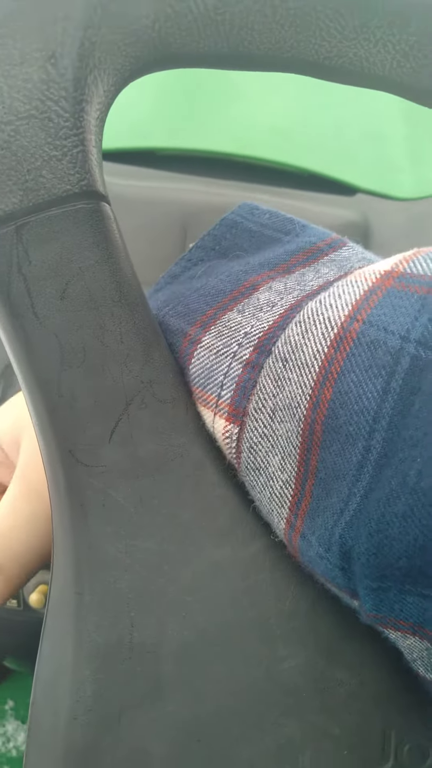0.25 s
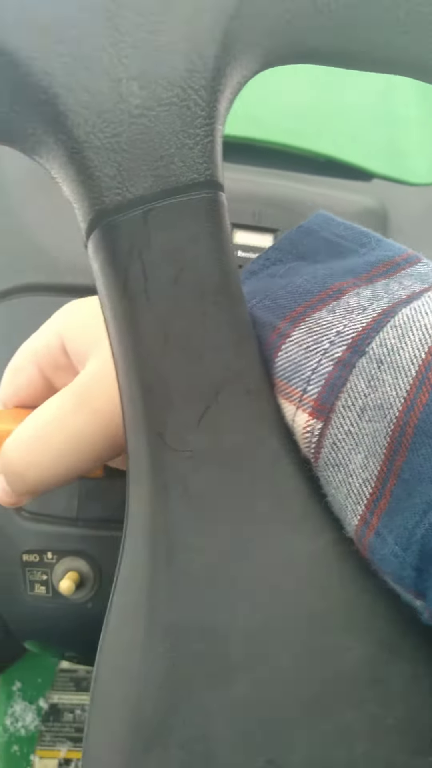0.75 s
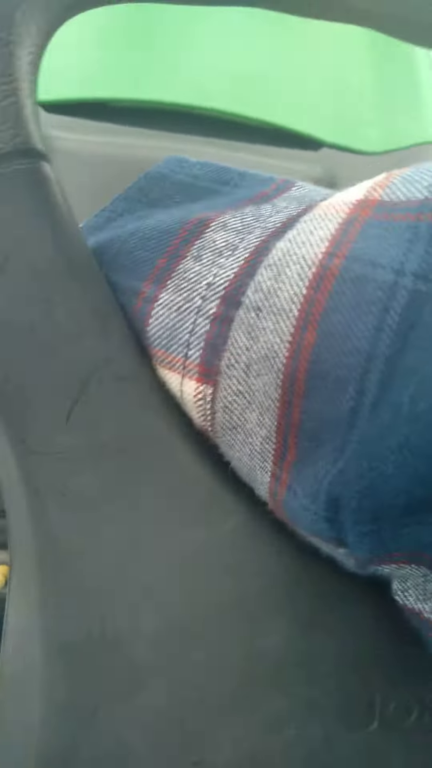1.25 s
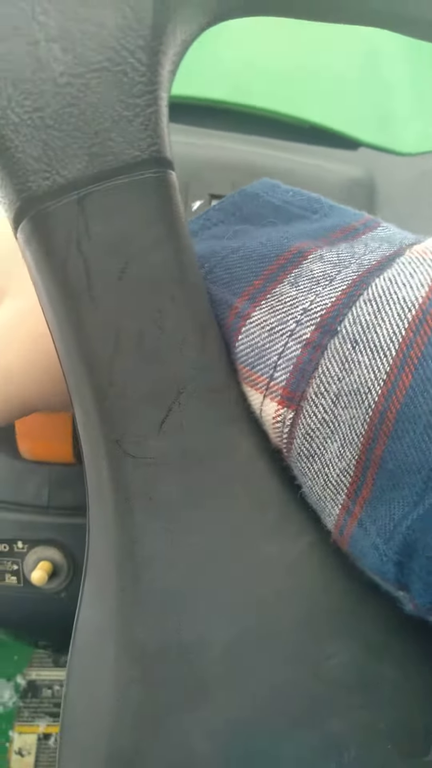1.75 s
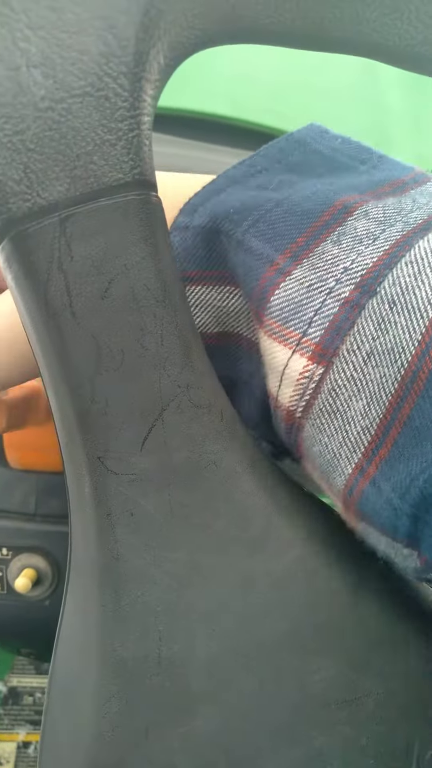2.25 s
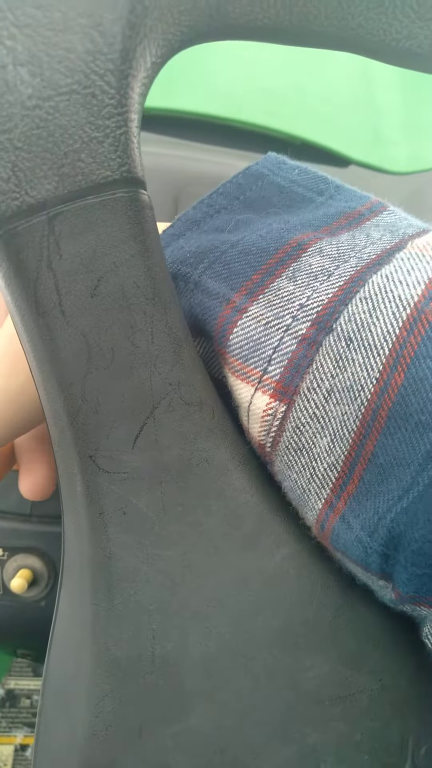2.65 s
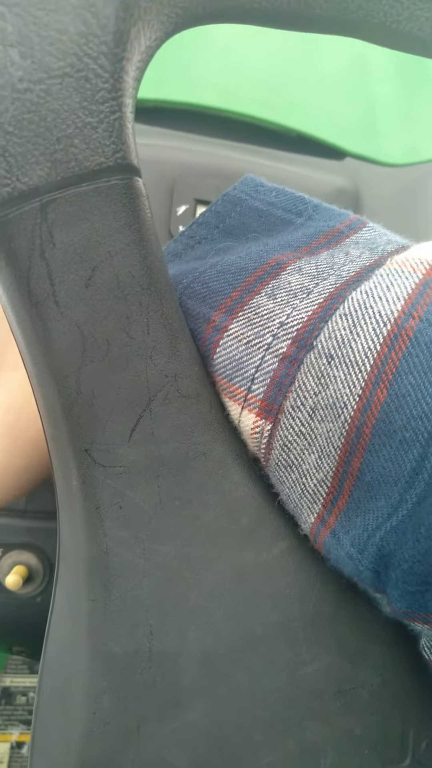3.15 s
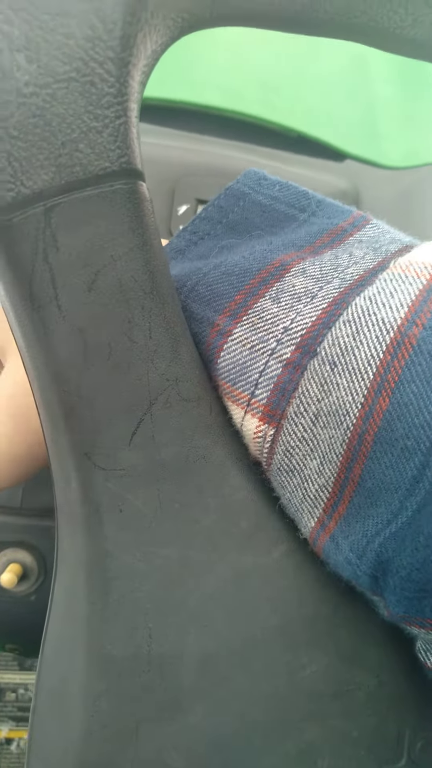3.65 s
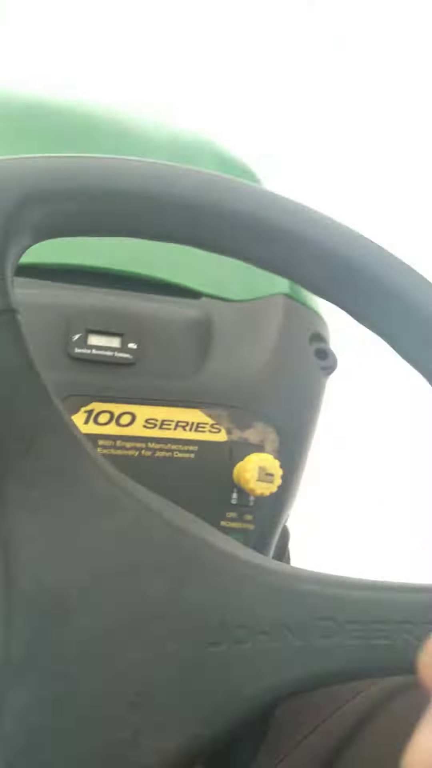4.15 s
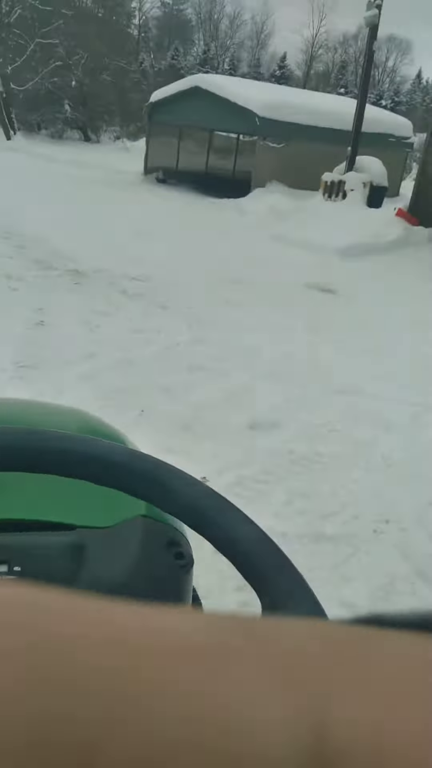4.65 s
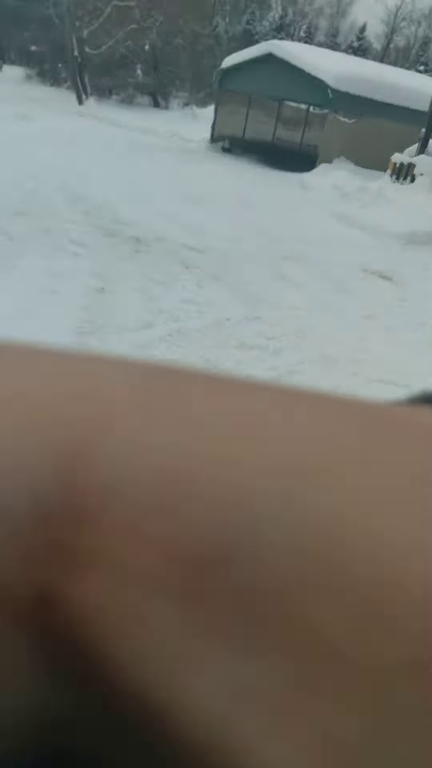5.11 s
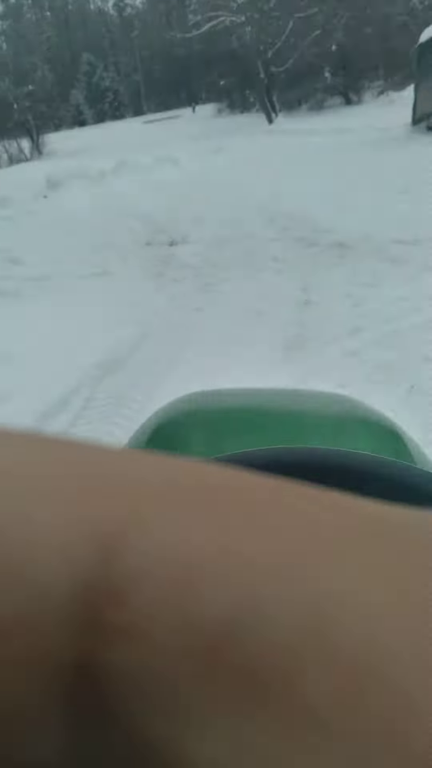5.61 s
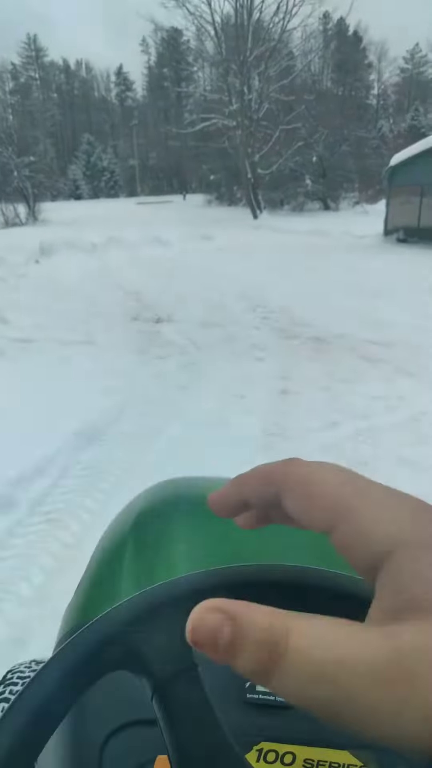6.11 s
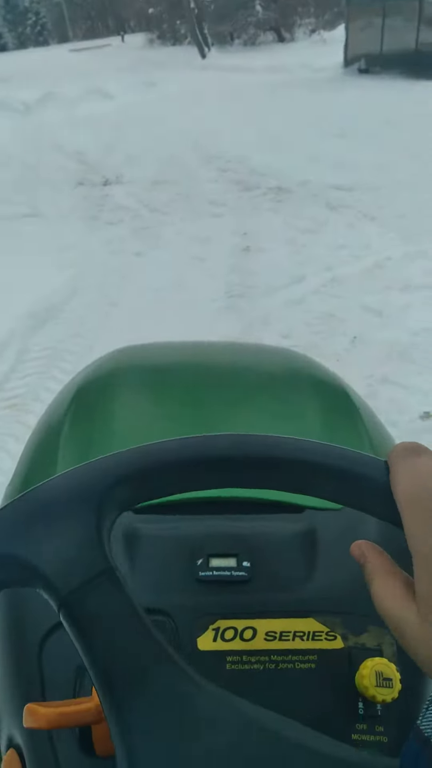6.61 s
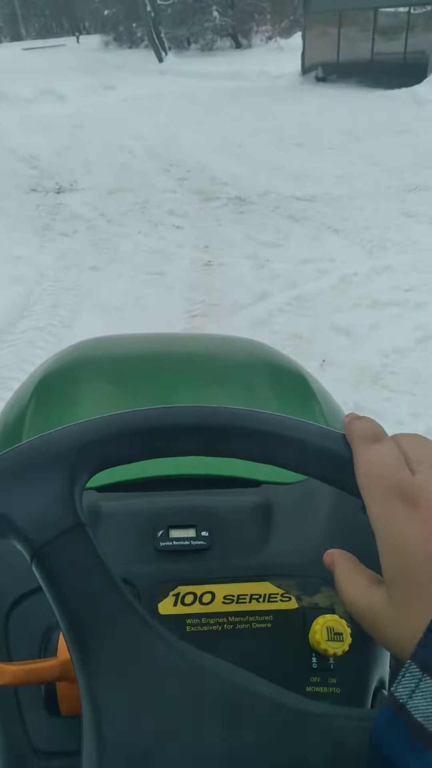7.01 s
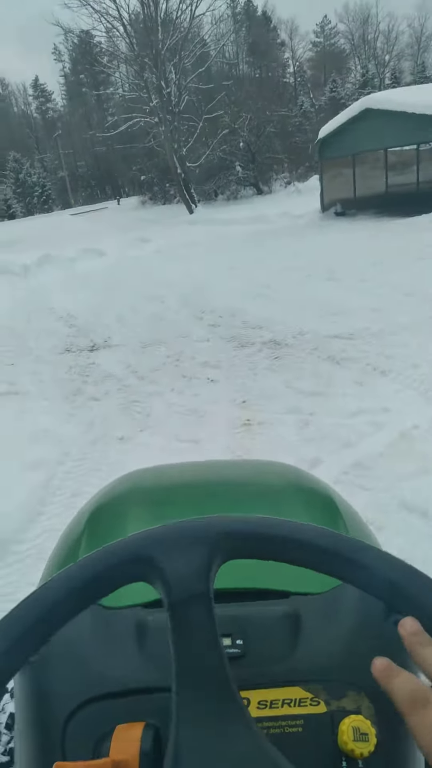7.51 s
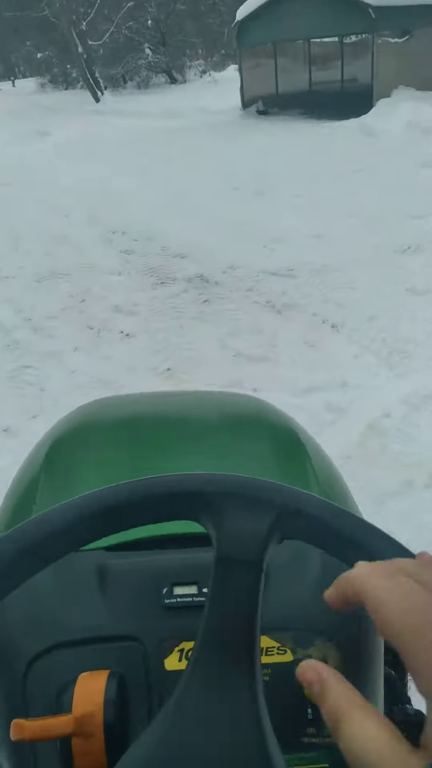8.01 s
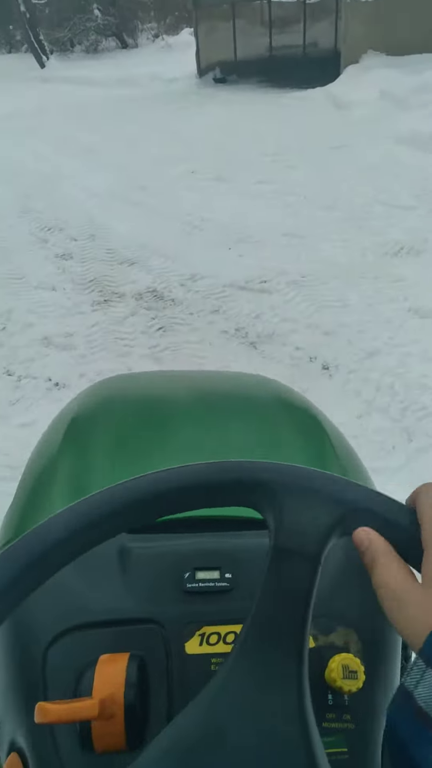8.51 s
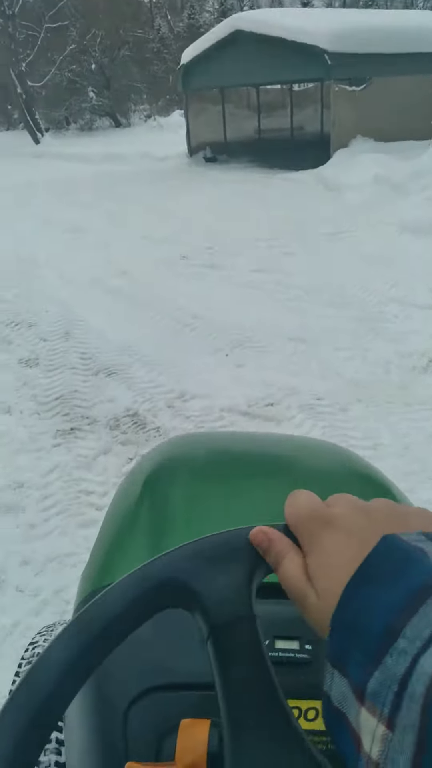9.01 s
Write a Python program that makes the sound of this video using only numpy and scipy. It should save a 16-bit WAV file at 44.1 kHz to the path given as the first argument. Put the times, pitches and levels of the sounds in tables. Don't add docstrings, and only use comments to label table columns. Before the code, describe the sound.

A small twin-cylinder tractor engine putters loudly up close, surging when throttled, with rattling tinwork, gassy hiss and missed beats.

```python
import sys
import numpy as np
from scipy import signal
from scipy.io import wavfile
from scipy.ndimage import map_coordinates

SR = 44100
rng = np.random.default_rng(int(sys.argv[2]) if len(sys.argv) > 2 else 0)


def volts(x):
    e = np.asarray(x, float) / 20
    return 10 ** e


def wrap_up_sound(samples):
    columns = np.atleast_2d(samples).T
    tamed = np.clip(columns, -1, 1)
    steps = np.round(tamed * 32767).astype(np.int16)
    wavfile.write(sys.argv[1], SR, steps)


N = 408366
TIME = np.arange(N) / SR
COARSE = np.arange(0, N + 4, 4) / SR
RAISED_AT_S, RAISING_S = 4.38, 0.31

# (time [s], rate [cycles/s])
ENGINE_SPEED = [(0.0, 17.404), (0.78, 15.74), (1.06, 20.055), (1.29, 21.767), (1.81, 18.586),
                (2.04, 21.885), (2.25, 23.206), (2.42, 23.402), (2.95, 21.588), (3.37, 20.593),
                (4.75, 19.778), (5.84, 19.381), (6.57, 20.135), (7.11, 16.981), (7.42, 19.086),
                (8.27, 20.804), (8.61, 21.249), (9.26, 20.562)]
# (valve closing [share of cycle], ring [dB], thump [dB], echo [dB], hiss [dB])
CYLINDER_PULSES = [
    (.915, 6, 16.5, -5.5, -7),
    (.29, 6, 15, 1, -4),
]
# (time [s], level [dB])
UPPER_TONE_PATH = [(0, -2), (.8, -11), (1.1, -1), (1.6, -4.5), (2.2, 1.5), (3.0, -0.5), (4.0, -2.5),
                   (4.7, -6.5), (6.3, -9.5), (6.8, -3), (7.6, -9.5), (8.2, -1.5), (9.26, -0.5)]


def rms_one(x):
    return x / np.sqrt(np.mean(x ** 2, axis=-1, keepdims=True) + 1e-20)


def in_time(rows):
    s, *columns = np.transpose(rows)
    return [np.interp(TIME, s, c) for c in columns]


def bump(u, at, width):
    return np.exp(-.5 * ((u - at) / width) ** 2)


def smooth_step(u, width):
    return .5 + .5 * np.tanh(u / width)


def flutter(rate_hz, channels=1):
    pole = np.exp(-2 * np.pi * rate_hz / SR)
    return rms_one(signal.lfilter([1], [1, -2 * pole, pole ** 2], rng.standard_normal((channels, N))))


def resonance(x, hz, width_hz):
    r = np.exp(-np.pi * width_hz / SR)
    feedback = [1, -2 * r * np.cos(2 * np.pi * hz / SR), r * r]
    return signal.lfilter((1 - r * r) / 2 * np.array([1, 0, -1]), feedback, x)


def panned(x, left_db):
    return x * volts(np.array([left_db / 2, -left_db / 2]))


def controls():
    # (time [s], level [dB])
    load = [(0.0, -25), (0.05, -28.5), (0.76, -26.5), (0.9, -19), (1.34, -18), (1.39, -24), (1.8, -22),
            (1.91, -20.5), (2.14, -19.5), (5.75, -23), (6.65, -20.5), (7.02, -23.5), (7.43, -18.5),
            (7.69, -23), (8.25, -24), (8.41, -29.5), (9.18, -29), (9.26, -27.5)]
    # (time [s], level [dB], left-right [dB])
    shake = [(0.0, -36.5, -3.5), (0.82, -40, -12), (0.98, -25.5, -13), (1.42, -32, -10), (1.78, -38, -7.5),
             (1.96, -26.5, -9.5), (2.47, -32, -10.5), (3.87, -37, -10), (4.13, -33.5, -8.5),
             (4.49, -38, -12.5), (4.93, -31.5, 0), (6.19, -27.5, -8.5), (6.96, -30, -5.5), (7.3, -23, -8),
             (7.82, -27.5, -9.5), (8.46, -35.5, -14), (8.82, -37, -8.5), (9.26, -36, -6)]
    # (time [s], level [dB], left-right [dB])
    cowling = [(0, 5, 6), (.8, -0.5, 8.5), (1.0, -0.5, 11.5), (1.5, 7.5, 10.5), (1.8, 2.5, 3),
               (2.2, 7.5, 9.5), (3.3, 7.5, 5), (3.9, 4, 8), (4.5, -6, -2.5), (5.2, -8.5, -2.5),
               (5.6, -11.5, 0), (6.4, -9, 6.5), (6.9, -3, -1), (7.4, -11, 2.5), (7.7, -7, 7.5),
               (8.1, 0.5, 3.5), (8.7, 10.5, 8), (9.26, 6.5, 3.5)]
    layer_levels = {"heave": (8.2, 1.1, 0.01, 0.01, 0.1), "edge": (-6, 1, 0.5, 0.39, -8),
                    "thump": (-19.5, 0.2, 0.03, 0.0969, -1), "ring": (-23, 1.54, 0.06, 0.46, 3.5),
                    "late": (-16, 0.15, 0.2, 1.02, -4), "shell": (-27.5, 0.9, 0.4, 1.22, -16),
                    "clatter low": (-39.5, 1.15, 0.43, 1.07, 4),
                    "clatter high": (-35.5, 0.55, 0.9148, 0.6041, 3.5),
                    "hiss low": (-33, 0.67, 0.99, 0.18, -1), "hiss high": (-32, 0.08, 1.44, 0.2, -1)}
    layer_sides = {"thump": (0, 0.24, 0, 0), "ring": (9, 1, 0.87, 0), "clatter low": (0, 0.22, 0, 0.97),
                   "clatter high": (-8, 7, 0.12, 0.87), "hiss low": (2.4, 3, 0.45, 0.033),
                   "hiss high": (-1.9, 1, 1.7, 0.99)}
    mean_load_db, mean_shake_db = -22, -31
    lag_low, lag_raised = 6, -9

    load_db, = in_time(load)
    shake_db, facing_db = in_time(shake)
    cowling_db, side_db = in_time(cowling)
    raised = smooth_step(TIME - RAISED_AT_S, RAISING_S)
    level = {name: db + a * (load_db - mean_load_db) + b * (shake_db - mean_shake_db)
             + c * cowling_db + up_db * raised
             for name, (db, a, b, c, up_db) in layer_levels.items()}
    side = {name: low_db + (up_db - low_db) * raised + a * facing_db + b * side_db
            for name, (low_db, up_db, a, b) in layer_sides.items()}

    racing = np.maximum(in_time(ENGINE_SPEED)[0] - 20.76, 0)
    level["racing"] = racing
    level["thump"] = level["thump"] + 1.24 * racing
    level["late"] = level["late"] + racing
    level["shell"] = level["shell"] - 3.5 * racing
    side["thump"] = side["thump"] - 2.5 * racing
    return level, side, lag_low + (lag_raised - lag_low) * raised


def turbulence(lag, columns, edges_hz, gate, grain_db, grain_hz, own_db, shared, ripple_db, ripple_hz, ripple_s):
    # (frequency [Hz], density [dB/Hz])
    noise_colour = [(410, -9), (700, -2.5), (947, -6), (1140, -8.5), (1540, -6.5), (1900, -8.5),
                    (2230, -4.5), (2900, -6), (4530, -8.5), (5160, -9), (8180, -7.5), (9700, -3.5),
                    (12000, -10.5), (15200, -12), (16200, -34)]
    # (frequency [Hz], left-right [dB])
    port_colour = [(700, -3), (4500, -0.5), (7500, 11), (9800, -2.5), (12000, 0), (16000, 10.5)]
    # (frequency [Hz], width [Hz], start [s], end [s], level [dB])
    posture_peaks = [(7200, 370, 5, 6.5, 5.5), (9240, 190, 6, 8.3, 4), (10120, 230, 5.5, 8.75, 4),
                     (11100, 200, 5.9, 8.7, 4.5), (4630, 340, 6, 10, -5), (4200, 1100, 4, 4.4, -3.5),
                     (1610, 230, 5.5, 6, 5.5), (1050, 130, 6.6, 7.2, 5.5), (1930, 310, 5, 6.1, -4.5),
                     (3100, 630, 7.5, 7.9, 3.5), (9600, 700, 4, 4.63, 2.5), (3380, 210, .9, 3.2, -4),
                     (1190, 76, 8.5, 9.4, -3), (5800, 960, 8.5, 7.2, -2.5), (750, 170, 2.9, 3.5, -3),
                     (2400, 200, 2.2, 3.7, 2), (8600, 300, 4, 6, 3.5), (8300, 400, 6.5, 6.9, -1.5),
                     (1500, 260, 7, 7.1, -3.5), (6460, 500, 0, 1, -3), (10700, 420, -0.5, 1, 4.5),
                     (11900, 700, 6.5, 7.1, -4), (1440, 120, 3.5, 4.16, 3), (3170, 630, 9, 9.2, 1)]
    fade_s = .08

    grains = grain_db * flutter(grain_hz) + own_db * flutter(grain_hz, channels=2)
    white = rng.standard_normal((2, N))
    lagged = np.clip(np.arange(N) + lag.astype(int), 0, N - 1)
    white[1] += shared * white[0, lagged]
    torn = rms_one(white * gate * volts(grains))
    hz, s, frames = signal.stft(torn, SR, nperseg=512)
    hz = np.maximum(hz, 1)

    noise_hz, noise_db = np.transpose(noise_colour)
    port_hz, port_db = np.transpose(port_colour)
    colour = volts(np.interp(np.log(hz), np.log(noise_hz), noise_db))
    colour = panned(colour, np.interp(np.log(hz), np.log(port_hz), port_db))
    low_db, high_db, low_pan_db, high_pan_db = (np.interp(s, TIME, c) for c in columns)
    gain = 0
    for low, high, db, pan_db in zip(edges_hz, edges_hz[1:], (low_db, high_db), (low_pan_db, high_pan_db)):
        band = rms_one(colour / np.sqrt((1 + (low / hz) ** 20) * (1 + (hz / high) ** 20)))
        gain = gain + band[:, :, None] * panned(volts(db + 0.5), pan_db)[:, None, :]

    grid = np.meshgrid(hz / ripple_hz, s / ripple_s, indexing="ij")
    ripple = [map_coordinates(field, grid, order=1) for field in rng.standard_normal((2, 260, 100))]
    held_db = 0
    for at_hz, width_hz, start, end, db in posture_peaks:
        held = smooth_step(s - start, fade_s) * smooth_step(end - s, fade_s)
        held_db = held_db + db * np.outer(bump(hz, at_hz, width_hz), held)
    frames = frames * gain * volts(held_db + ripple_db * np.array(ripple))
    return signal.istft(frames, SR, nperseg=512)[1][:, :N]


def fan(cycle, level, flow):
    # (time [s], level [dB])
    shroud = [(0, -37), (.75, -59), (1, -34), (2.2, -35), (3.6, -36), (4.2, -33.5), (5.2, -41), (7, -45.5),
              (9.26, -50)]
    gear_multiples = (30, 35, 38, 40, 43, 51, 57, 66)
    gear_levels = (-7.5, -4.5, -10.5, -11, -12.5, -13.5, -15.5, -14)

    angle = 2 * np.pi * np.interp(TIME, COARSE, cycle)
    gears = 0
    for k, db in zip(gear_multiples, gear_levels):
        waver = volts(db + 2.5 * flutter(1.65)[0])
        gears = gears + waver * np.sin(angle * k + .4 * flutter(26.0)[0])
    gears = gears * rms_one(flow) * volts(in_time(UPPER_TONE_PATH)[0])

    idle = TIME < .84
    shaft = np.sin(angle * np.where(idle, 20, 16))
    fins = np.sin(angle * np.where(idle, 38, 32))
    belt = np.sin(angle * 12)
    shaft_db = -39 + 2.5 * (in_time(ENGINE_SPEED)[0] - 20) + 6 * idle
    waver_db = 2.5 * flutter(22.0, channels=2)
    tones = volts(shaft_db + waver_db[0]) * shaft + volts(in_time(shroud)[0] + waver_db[1]) * fins
    tones = tones + volts(-48.5) * belt + volts(level["clatter low"]) * gears
    return panned(np.sqrt(2), 6)[:, None] * tones


def valve_gear(cycle, level, side):
    # (frequency [Hz], level [dB], decay time T60 [s])
    tinwork = [
        (1083, -6, 0.056),
        (1645, -3.5, 0.012),
        (2276, -5.5, 0.054),
        (3070, -10.5, 0.012),
        (5980, -7.5, 0.013),
        (7170, 0, 0.012),
        (8800, -8, 0.02),
        (9890, -2.5, 0.019),
        (10760, -8, 0.035),
    ]
    # (time [s], peak (unused) [dB], low modes [dB], high modes
    # [dB])
    knocks = [(0.893, -13.5, -16, -22), (0.946, -5, -32, -32), (1.0727, -6, -26, -12.5),
              (1.8597, -10, -29, -22), (1.8922, -7, -28, -18), (1.9416, -1, -18, -17),
              (2.8075, -5, -4.5, -20), (3.028, -4, -12, -33), (4.296, -22, -21, -34),
              (4.9323, -20, -31, -23), (5.1025, -25, -22, -32), (5.3059, -16, -39, -31),
              (5.51, -16, -34, -19), (5.5938, -18, -38, -25), (5.614, -5, -32, -15.5),
              (5.75, -13, -34, -24), (5.872, -7, -22, -23), (5.905, -13, -22, -23), (5.923, 0, -30, -16.5),
              (5.954, -12, -40, -22), (5.974, 14, -37, -24), (6.007, -10, -33, -15), (6.0768, -8, -32, -17),
              (6.1082, -22, -39, -14), (6.2273, -8, -37, -12), (6.3101, -11, -37, -18),
              (6.3291, -13, -34, -25), (6.363, -8, -16, -18), (6.5296, -13, -34, -24),
              (6.5616, -15, -35, -25), (6.5788, -13, -31, -35), (6.6815, -10, -21, -25),
              (7.1222, -10, -28, -13), (7.3448, -6, -24, -26), (7.38, -6, -24, -19), (8.107, -8, -20, -21),
              (8.2333, -14, -16, -33), (8.4912, -13, -25, -21), (8.756, -16, -19, -37),
              (8.852, -23, -11, -38), (8.898, -19, -27, -32), (9.044, -10, -35, -24),
              (9.0917, -13.5, -16, -29), (9.1876, -17, -35, -23), (9.2365, -17, -26, -23),
              (7.4318, -14, -23, -28), (7.4507, -16, -18, -19), (7.4813, -16, -33, -14),
             (7.5525, -19, -26, -13), (7.587, -30, -27, -15), (7.6064, -15, -25, -19),
             (7.6572, -12, -22, -23), (7.69, -15, -37, -31), (7.7396, -19, -34, -26),
             (7.7585, -15, -35, -28), (7.789, -18, -34, -28), (7.858, -23, -28, -34),
             (7.9336, -17, -17, -25), (8.0578, -23, -28, -30)]

    lifts = np.concatenate([np.arange(-1, cycle[-1]) + shut - .085 for shut, *_ in CYLINDER_PULSES])
    lifts = lifts[(lifts > 0) & (lifts < cycle[-1] - .01)]
    at = (np.interp(lifts, cycle, COARSE) * SR).astype(int)
    force_db = 5.6 * rng.uniform(-1.3, 1, len(at)) + 3.5 * (lifts % 1 > .5)
    knock_s, _, low_db, high_db = np.transpose(knocks)
    knock_at = (knock_s * SR).astype(int)
    out = 0
    for hz, level_db, t60 in tinwork:
        if hz < 4500:
            name, knock_db = "clatter high", low_db - 7.5
        else:
            name, knock_db = "hiss low" if hz < 8000 else "hiss high", high_db + 4
        ticks = np.full((2, N), 1e-18)
        force = volts(force_db + 4 * rng.uniform(-1, 1, (2, len(at))))
        ticks[:, at] = force * rng.choice([-1, 1], (2, len(at)))
        ticks[:, knock_at] = volts(knock_db - level[name][knock_at] - 0.28 * level_db)
        r, w = volts(-60 / (t60 * SR)), 2 * np.pi * hz / SR
        rung = rms_one(signal.lfilter([0, np.sin(w)], [1, -2 * r * np.cos(w), r * r], ticks))
        out = out + volts(level[name] + level_db - 11.0) * panned(rung, side[name])
    return out


def thump(u, push, edge, recover):
    shut = smooth_step(u, edge)
    held = smooth_step(u + push, 1.4 * edge) * (1 - shut)
    return held - 1.06 * shut * np.exp(-(np.maximum(u, 0) / recover) ** 0.55)


def ring(u, order, rise, fall, steep, scatter):
    angle = 2 * np.pi * order * u
    upper = np.cos(2 * angle + 0.56 + scatter) + 0.98 * np.cos(1.645 * angle - 2 * scatter)
    return bump(u, 0, np.where(u < 0, rise, fall)) * (np.cos(angle) + steep * upper)


def firings(cycle, level):
    # (first [s], how many, ring [dB], thump [dB])
    misfires = [(0.009, 6, -5, -15), (0.731, 1, -9, -3), (0.771, 2, -8, -1), (0.794, 1, -7, 0),
                (0.832, 1, -9, -1), (0.855, 1, -7, -1), (1.356, 1, -8, -9), (1.385, 1, -12, -2),
                (1.402, 5, -7, -9), (1.432, 2, -17, -8), (1.63, 3, -7, -2), (1.786, 1, -6, -1),
                (2.618, 5, -7, -7), (3.073, 4, -11, -4), (3.457, 1, -6, -7), (3.653, 2, -10, -6),
                (4.677, 1, -15, -7), (5.594, 1, -5, -1), (6.46, 1, -7, -2), (6.764, 1, -7, -1),
                (6.837, 1, -11, -8), (6.871, 1, -8, 0), (7.003, 1, -5, 0), (7.706, 1, -6, -2),
                (7.858, 1, -6, -2), (8.868, 1, -6, -5), (9.108, 1, -10, -4)]
    # (time [s], pitch [Hz])
    ring_pitch = [(0.0, 387), (0.05, 470), (0.36, 395), (0.72, 370), (0.95, 446), (1.31, 480), (1.67, 396),
                  (2.01, 472), (2.37, 497), (4.98, 420), (6.86, 424), (6.99, 395), (7.32, 450), (7.74, 414),
                  (8.36, 450), (9.26, 434)]
    ring_at = -.138
    round_trip = 7
    scatter_rad = .35

    thumps, heaves, rings, late, flow = 0, 0, 0, 0, .32
    pace = np.gradient(cycle, COARSE) / 20
    bite_db = np.interp(COARSE, TIME, level["clatter low"] - level["ring"])
    steep = np.minimum(volts(bite_db - 4 + np.interp(COARSE, *np.transpose(UPPER_TONE_PATH))), .5)
    chance = rng.standard_normal((2, int(cycle[-1]) + 3, 4))
    for (shut, ring_db, thump_db, echo_db, hiss_db), luck in zip(CYLINDER_PULSES, chance):
        turn = cycle - shut + 1.3
        k, u = turn.astype(int), turn % 1 - .3
        when = np.interp(np.arange(len(luck)) + shut - 1.125, cycle, COARSE)
        weak = np.zeros((len(luck), 2))
        for s, many, *drop_db in misfires:
            for first in np.flatnonzero(np.abs(when - s) < .008):
                weak[first:first + 2 * many:2] = drop_db
        burn = volts(ring_db + weak[:, 0] + 0.7 * luck[:, 0])[k]
        push = volts(weak[:, 1] + 0.6 * luck[:, 1])[k]

        v = u + .0012 * luck[k, 2] - ring_at
        pitch_hz = np.interp(when, *np.transpose(ring_pitch)) * (1 + .004 * luck[:, 3])
        order = pitch_hz[k] / (20 * pace)
        rings = rings + burn * ring(v, order, 0.045 * pace, 0.069 * pace ** 2.6, steep, scatter_rad * luck[k, 0])
        late = late + burn * ring(v - round_trip / order, order, 0.08, 0.13, steep, scatter_rad * luck[k, 3])

        blow = thump(u / pace, 0.053, 0.0054, 0.13) - 0.049 * bump(u, -0.208, 0.021)
        echo = volts(echo_db) * thump((u - .195) / pace, 0.0066, 0.0092, 0.085)
        thumps = thumps + volts(thump_db) * push * (blow + echo)
        heaves = heaves + np.maximum(.8 - push, 0) * (bump(u, .03, .05) - bump(u, .18, .05))

        jet = 1.04 * bump(u, -0.087, np.where(u < -.085, .008, .03))
        jet = jet + 0.47 * bump(u, 0.0022, 0.0056) + 0.35 * bump(u, 0.15, 0.09)
        hiss_dips = 0.27 * (bump(u, -0.029, 0.0083) + bump(u, 0.036, 0.0052))
        flow = flow + volts(hiss_db + 2.4 * luck[k, 1]) * jet - hiss_dips
    pulses = (thumps, heaves, rings, late, np.maximum(flow, .03))
    return [np.interp(TIME, COARSE, c) for c in pulses]


def exhaust(thumps, heaves, rings, late, flow, level, side, lag):
    # (frequency [Hz], width [Hz])
    muffler = [
        (430, 183),
        (560, 184),
    ]

    churn = rng.standard_normal((2, N)) * flow
    churn = churn + 0.27 * churn[::-1]
    drum, shell = (rms_one(resonance(resonance(churn, *mode), *mode)) for mode in muffler)
    blowdown = rms_one(rings) + volts(level["late"]) * rms_one(late) + volts(-12) * drum
    blowdown = volts(level["ring"]) * blowdown + volts(level["shell"] - 6.5) * shell
    blowdown = panned(blowdown, side["ring"])

    piped = signal.sosfiltfilt(signal.butter(2, 90, "high", fs=SR, output="sos"), thumps)
    boom = (0.41 + 0.36 * level["racing"]) * resonance(piped, 187.8, 34)
    piped = piped + boom - 0.66 * resonance(piped, 238, 303)
    buffet_band = signal.butter(2, [45, 230], "band", fs=SR, output="sos")
    buffet = signal.sosfilt(buffet_band, rng.standard_normal((2, N)))

    squared = np.tanh(rms_one(piped))
    sharp, body = (signal.sosfiltfilt(signal.butter(2, hz, fs=SR, output="sos"), squared) for hz in (2900, 535))
    squared = body + volts(level["edge"]) * (sharp - body)
    squared = squared - np.minimum(0.53 * level["racing"], .9) * resonance(squared, 285, 210)
    low = rms_one(squared) + volts(level["heave"]) * heaves + volts(-16.0) * rms_one(buffet)
    both = blowdown + volts(level["thump"]) * panned(low, side["thump"])
    return np.array([np.interp(TIME - lag / SR, TIME, both[0]), both[1]])


def scene():
    cycle = np.cumsum(np.interp(COARSE, *np.transpose(ENGINE_SPEED))) * COARSE[1]
    level, side, lag = controls()
    *pulses, flow = firings(cycle, level)
    bands = {name: [way[name + part] for way in (level, side) for part in (" low", " high")]
             for name in ("clatter", "hiss")}
    clatter = turbulence(lag, bands["clatter"], (620, 1500, 4000), flow ** 0.75, grain_db=2.0, grain_hz=55.6,
                         own_db=2.0, shared=0.32, ripple_db=4.5, ripple_hz=110, ripple_s=.12)
    hiss = turbulence(lag, bands["hiss"], (4700, 8000, 17500), flow ** 0.92, grain_db=0.0, grain_hz=143,
                      own_db=-2.5, shared=0.13, ripple_db=4.0, ripple_hz=180, ripple_s=.15)
    engine = exhaust(*pulses, flow, level, side, lag)
    return engine + fan(cycle, level, flow) + valve_gear(cycle, level, side) + clatter + hiss


def band_limit(x):
    return signal.sosfilt(signal.butter(12, 16430, fs=SR, output="sos"), x)


def record(dry):
    thin = signal.sosfiltfilt(signal.butter(2, 60, "high", fs=SR, output="sos"), dry)
    rounded = thin / (1 + np.abs(thin / .9) ** 6) ** (1 / 6)
    return band_limit(rounded)


dry = scene()
out = record(dry)
wrap_up_sound(out)
```